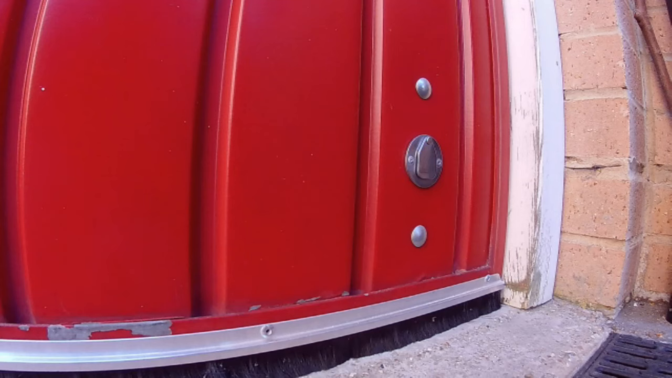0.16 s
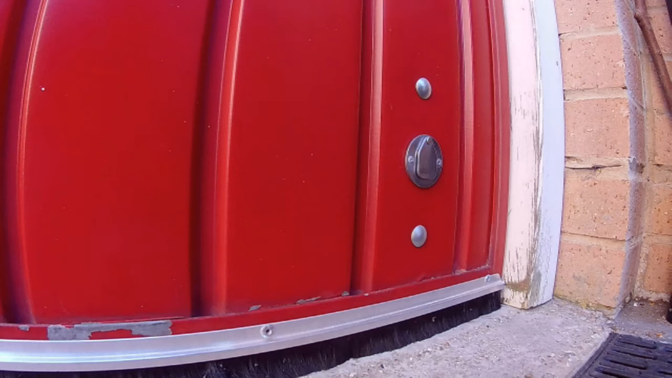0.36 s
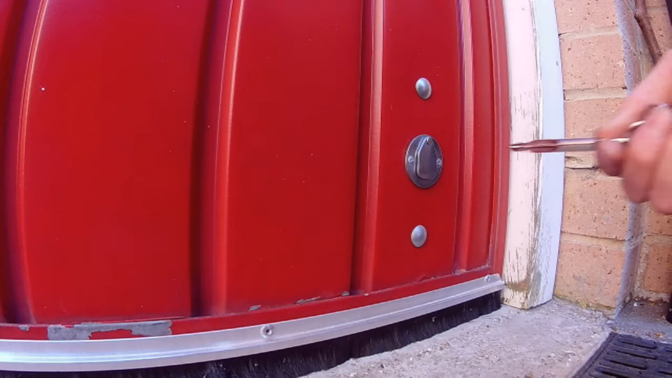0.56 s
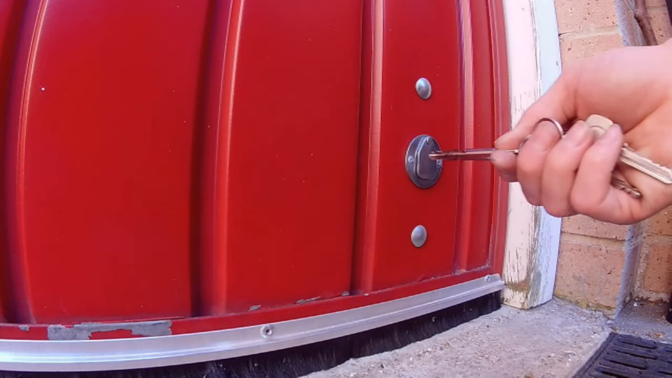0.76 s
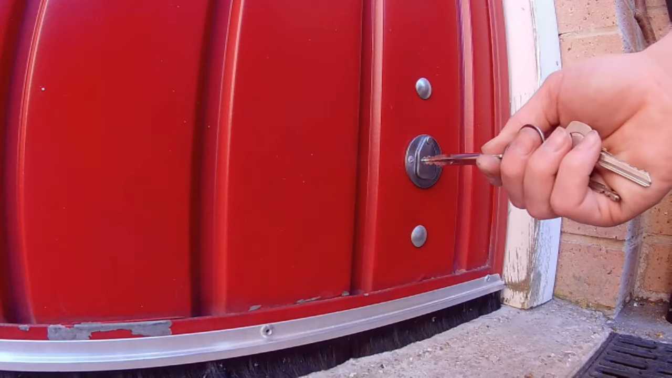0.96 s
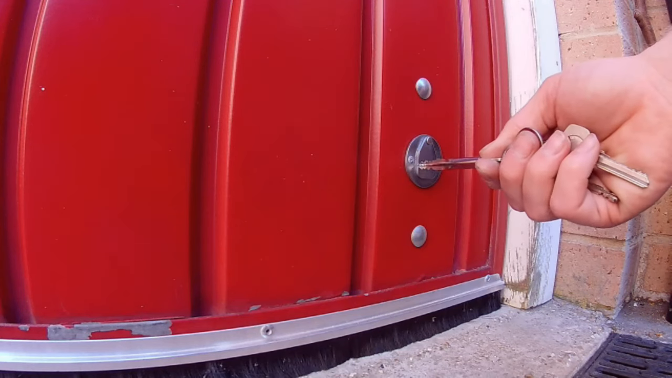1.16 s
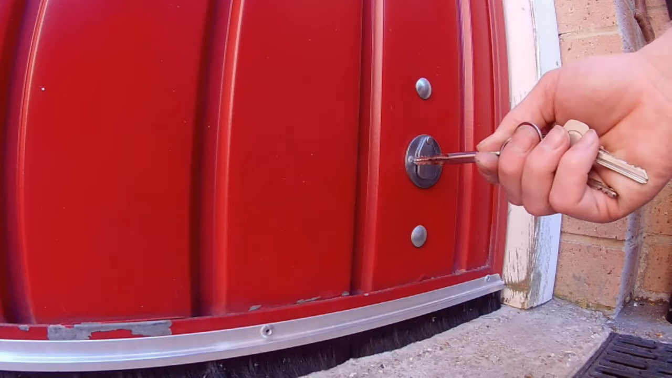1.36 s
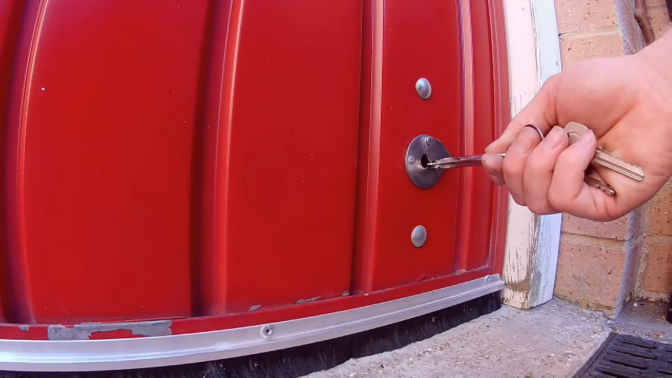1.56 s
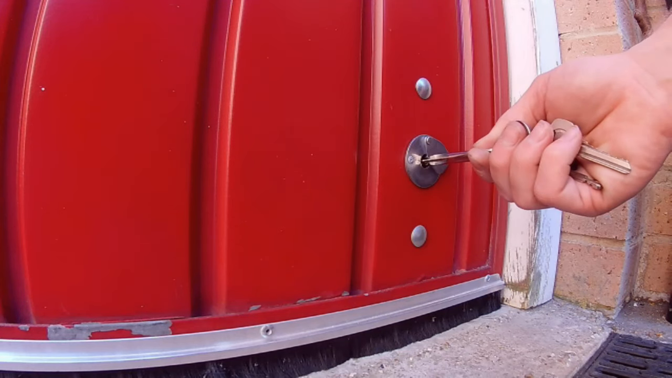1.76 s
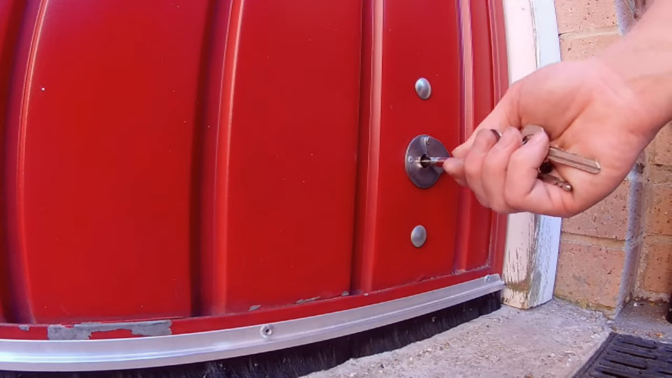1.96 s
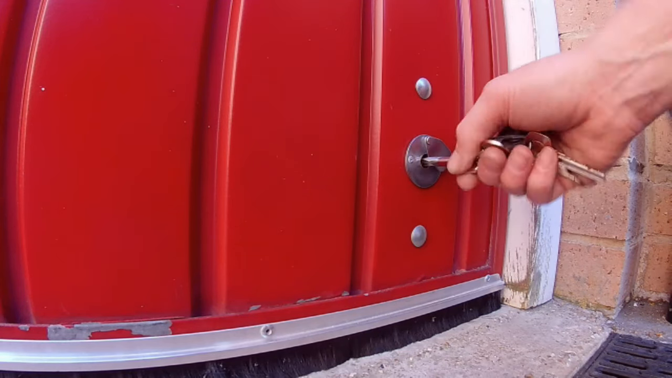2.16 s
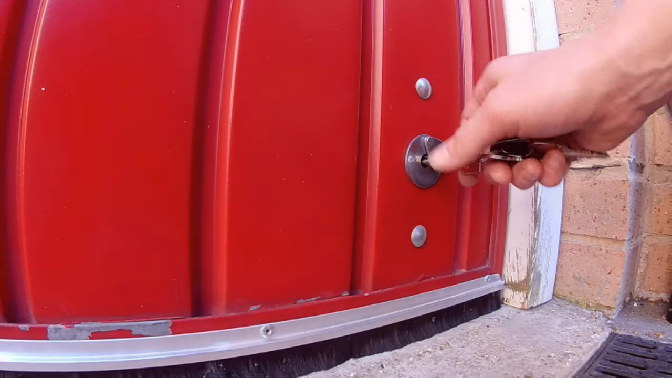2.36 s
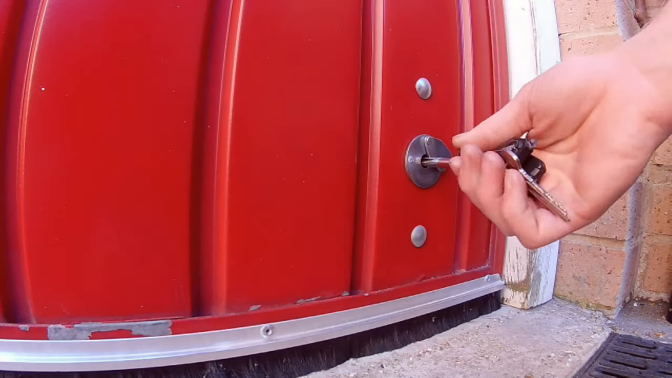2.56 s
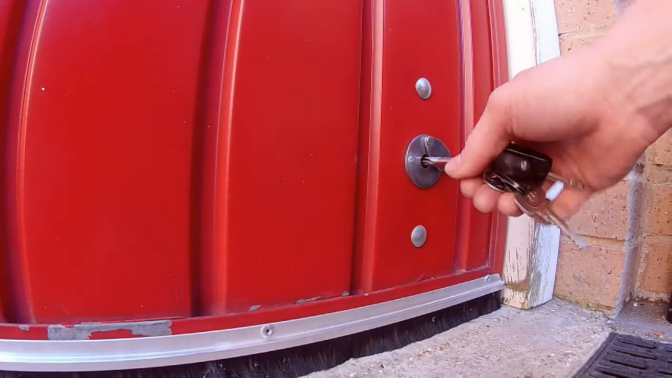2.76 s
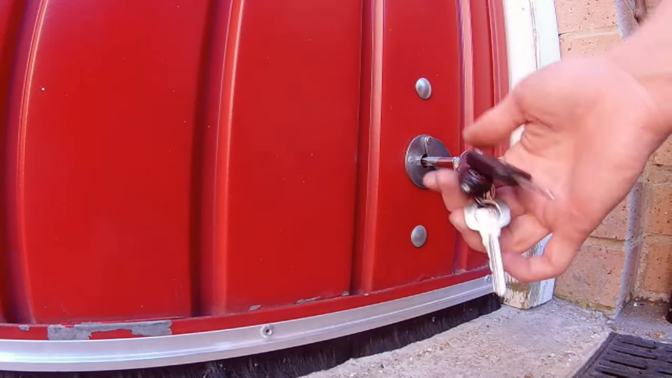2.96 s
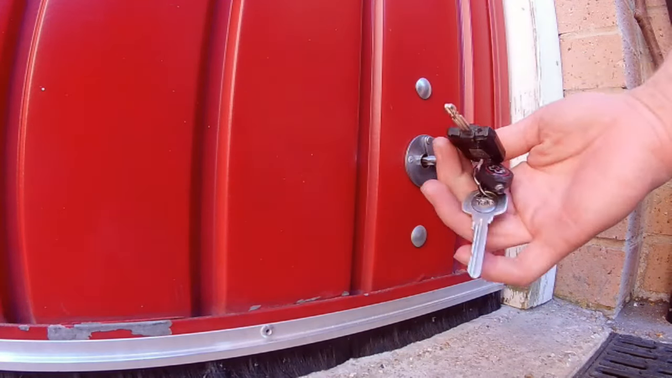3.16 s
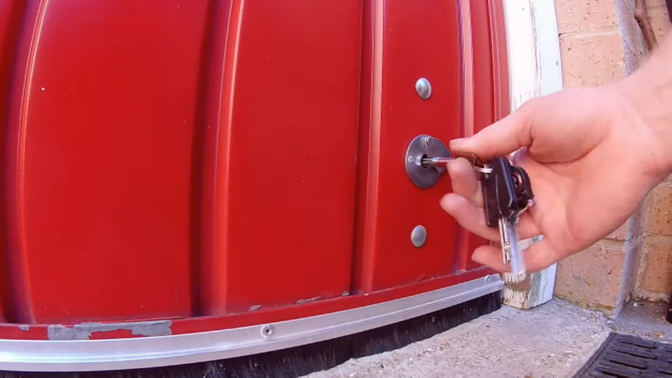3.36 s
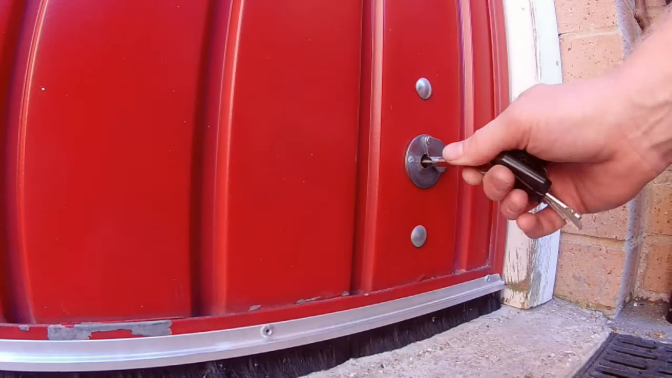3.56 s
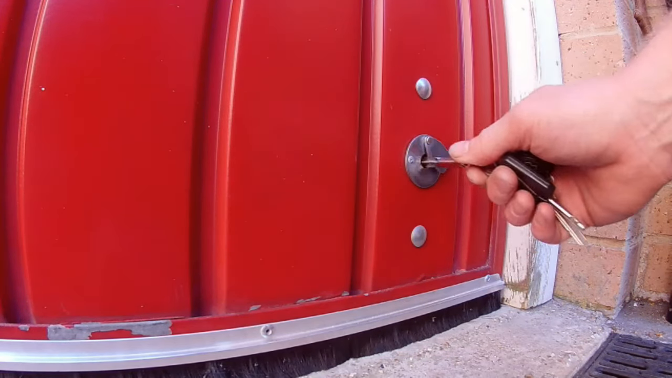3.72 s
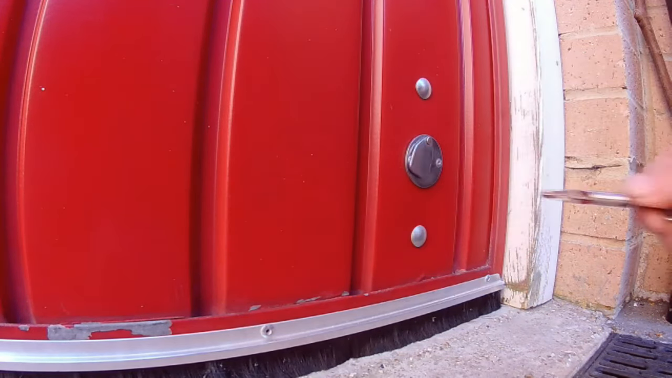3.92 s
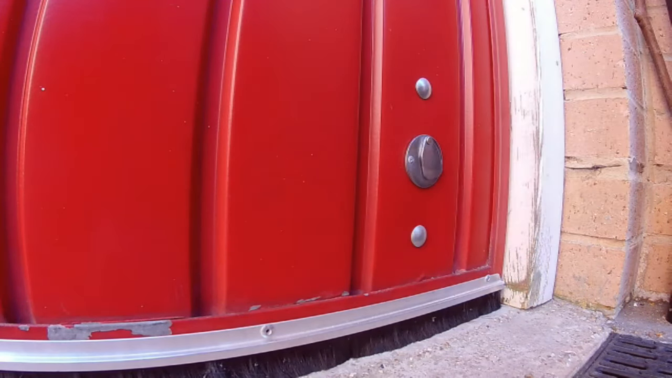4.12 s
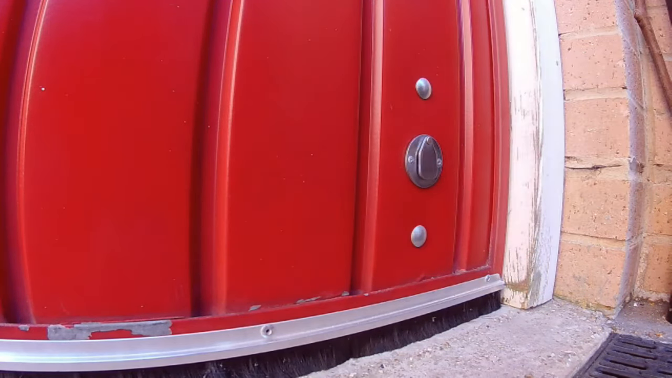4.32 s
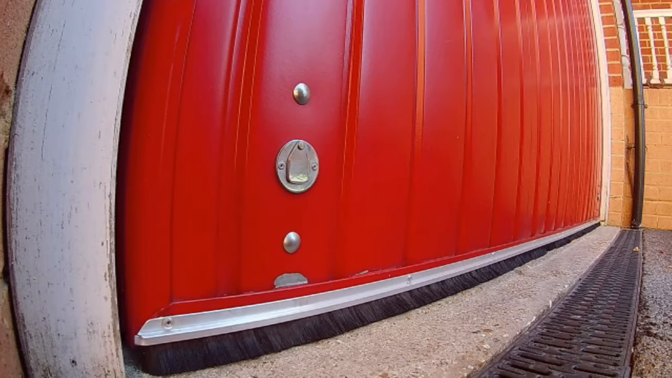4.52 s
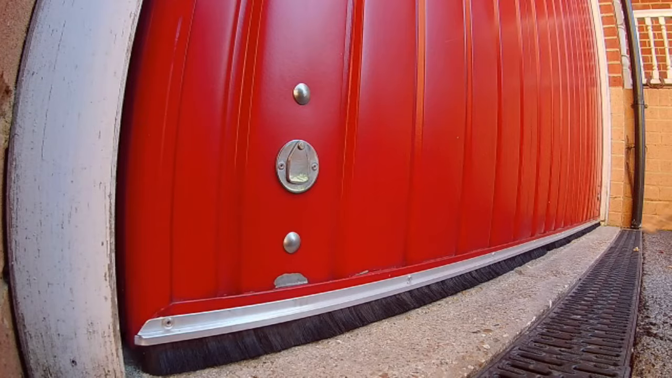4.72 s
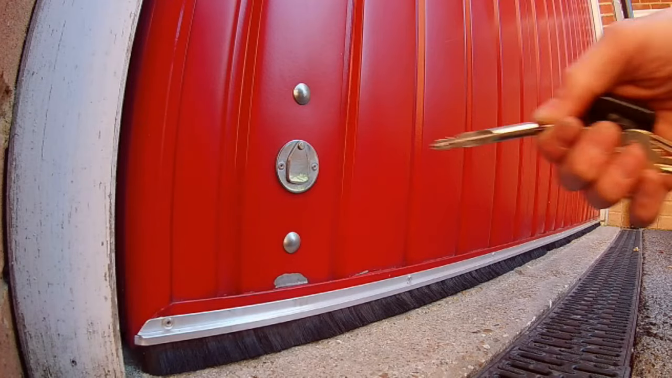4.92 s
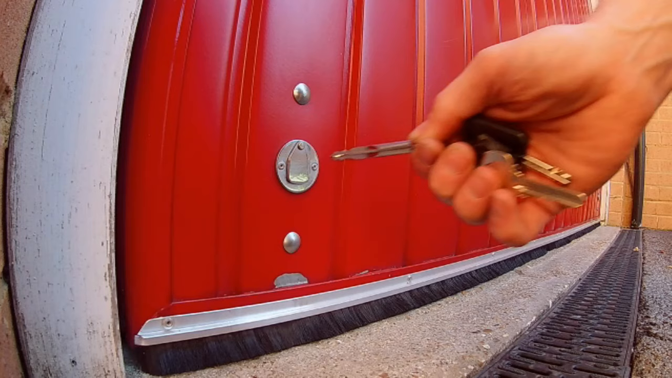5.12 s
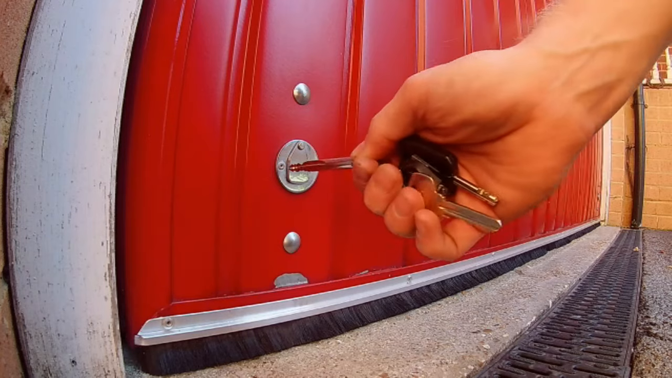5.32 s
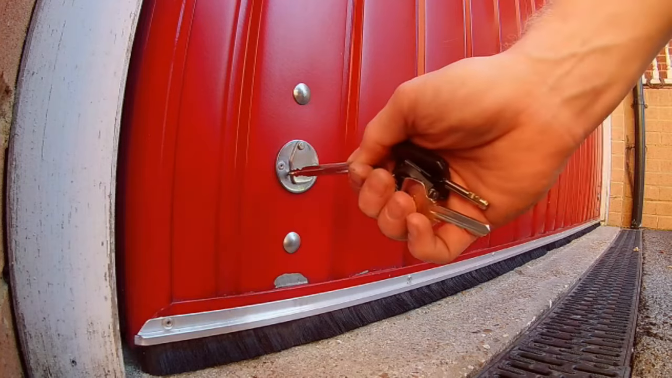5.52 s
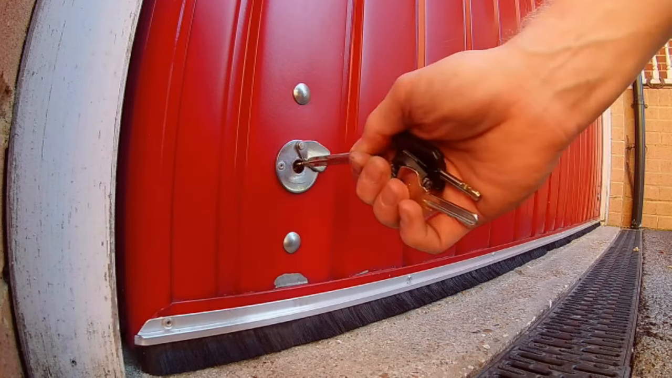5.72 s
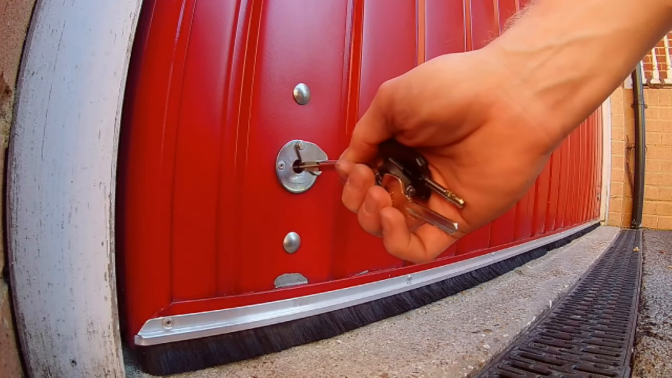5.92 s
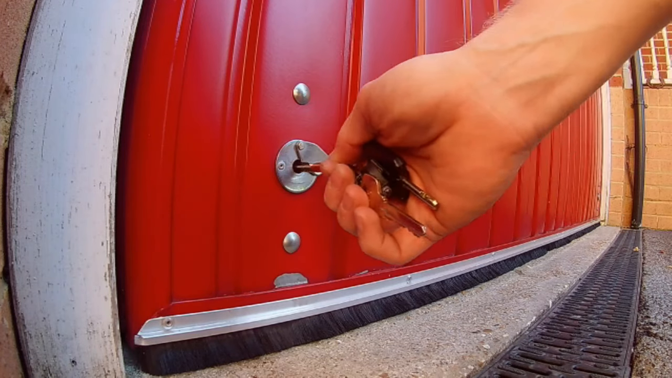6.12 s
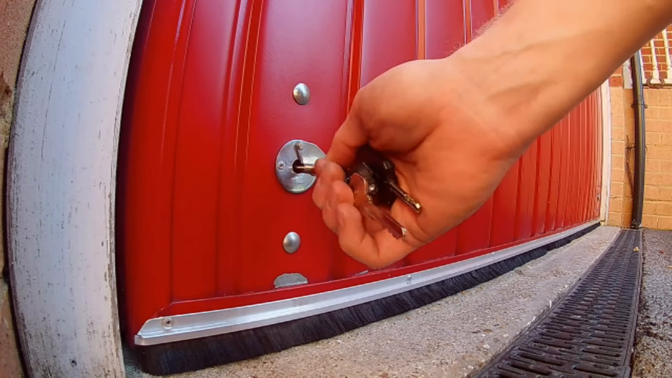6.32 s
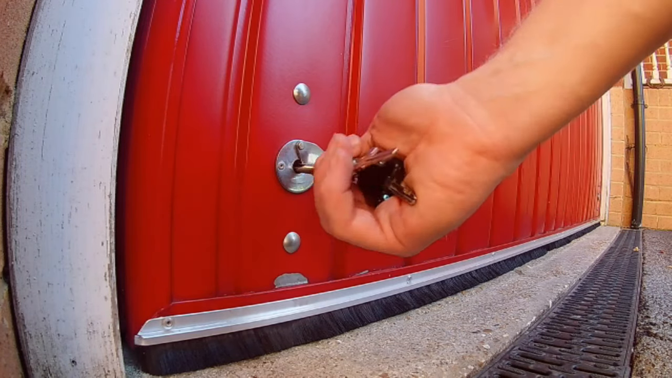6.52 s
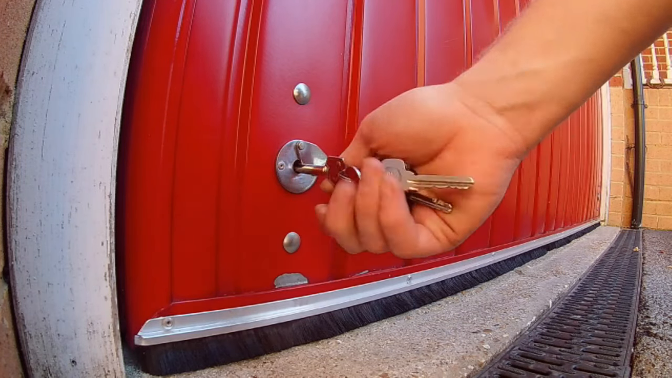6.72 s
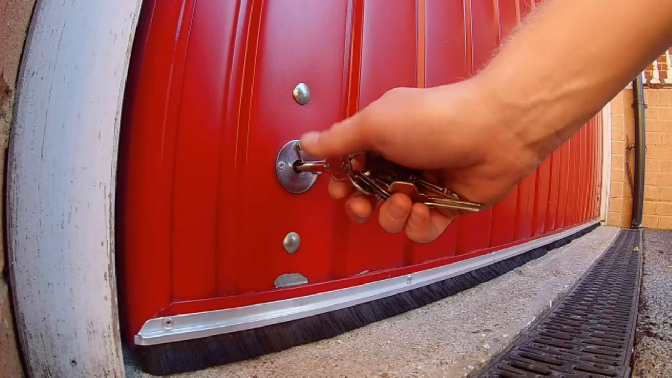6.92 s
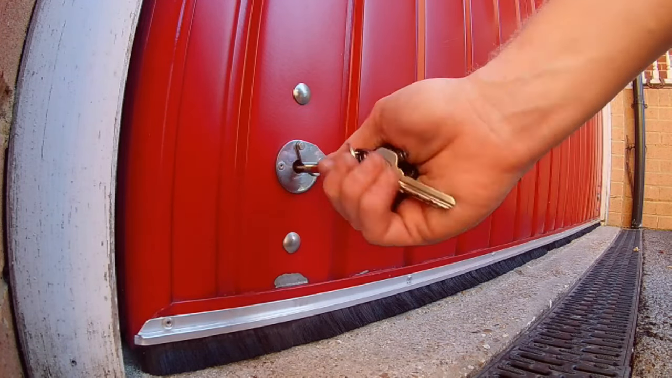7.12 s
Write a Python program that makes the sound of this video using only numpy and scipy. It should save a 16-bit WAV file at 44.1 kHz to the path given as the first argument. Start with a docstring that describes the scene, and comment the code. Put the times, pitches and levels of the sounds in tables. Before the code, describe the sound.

Outdoors, close by, a key taps and scrapes into the lock of a steel garage door and turns with stiff clacks, the panel booming low. The other keys clink on their ring, and the key comes out with a sharp clank. After a short pause it scrapes into a second lock and turns, ending in a loud rattling clack and a hollow bong. A faint distant rumble lies behind.

```python
"""Outdoors at two steel garage doors, a long key is fed into each lock in turn, twisted and drawn out.
Impacts and stick-slip friction in the lock excite the bending modes of the sheet steel. The panel booms
under the hand and bongs as the key levers against it; the first door sways once the key is out.
The rest of the bunch clinks on its ring. Quiet air and a faint, very high ticking lie behind."""
import sys
import numpy as np
from scipy import signal
from scipy.io import wavfile
from scipy.ndimage import uniform_filter1d

SR = 44100
rng = np.random.default_rng(int(sys.argv[2]) if len(sys.argv) > 2 else 0)


def waveform_to_disk(signal):
    """Save audio, clipped to [-1, 1], as 16-bit WAV at the path in sys.argv[1]."""
    frames = np.transpose(np.atleast_2d(signal))
    scaled = np.clip(frames, -1, 1) * 32767
    samples = np.round(scaled).astype(np.int16)
    wavfile.write(sys.argv[1], SR, samples)


N = 316638
T = np.arange(N) / SR
RING_T = T[:SR]
SECOND_DOOR_S = 4.377

def door_at(s):
    """Index of the door in use at time s."""
    return int(s > SECOND_DOOR_S)

def amp(db):
    """Decibels to amplitude ratio."""
    return 10 ** (np.asarray(db) / 20)

def unit(x, size=None):
    """Normalisation: the first size samples get rms 1."""
    return x / np.sqrt(np.mean(x[:size] ** 2) + 1e-24)

def read(points, hz):
    """Interpolation on a log-frequency axis."""
    f, value = np.transpose(points)
    return np.interp(np.log(hz + 1), np.log(f), value)

def add(mix, s, sound):
    """Superposition of a sound from time s."""
    part = mix[round(s * SR):][:len(sound)]
    part += sound[:len(part)]

def band(x, hz, kind, order=4):
    """Causal Butterworth filter."""
    return signal.sosfilt(signal.butter(order, hz, kind, fs=SR, output="sos"), x)

def narrow_noise(hz, width_hz, order=2):
    """Narrow-band noise: neighbouring components beat, giving a wavering tone."""
    return unit(band(rng.standard_normal(N), [hz - width_hz / 2, hz + width_hz / 2], "band", order))

def colour(x, points, size=8192):
    """Minimum-phase filter through (Hz, dB) points."""
    log_gain = np.log(amp(read(points, abs(np.fft.fftfreq(size, 1 / SR)))))
    taps = np.fft.ifft(np.exp(np.conj(signal.hilbert(log_gain)))).real[:size // 2]
    return signal.fftconvolve(x, taps)[:len(x)]

def modes(table, scatter_db=2.5):
    """Free vibration: a sum of damped sines whose shares vary with the point of impact."""
    hz, db, t60 = np.transpose(table)[:, :, None]
    share = amp(db + scatter_db * rng.standard_normal(hz.shape)) * rng.choice([-1, 1], hz.shape)
    return (share * amp(-60 * RING_T / t60) * np.sin(2 * np.pi * hz * RING_T)).sum(0)

# Air at each door. Each row: frequency in Hz, relative spectral density in dB.
AIR_1 = [(20, -13.5), (107, -3), (270, -14), (738, -24.5), (1000, -20), (1220, -28), (11100, -52.5),
         (12800, -42.5), (16000, -48)]
AIR_2 = [(20, -15), (101, -2.5), (138, -15), (377, -26), (1220, -31), (1440, -38.5), (3200, -48),
         (9670, -57), (16000, -52)]

def air(first_db=-58, second_db=-54, hum_db=-61):
    """Ambient noise: a distant broadband rumble with a narrow-band hum in it."""
    first = amp(first_db) * unit(colour(rng.standard_normal(N), AIR_1))
    second = amp(second_db) * unit(colour(rng.standard_normal(N), AIR_2))
    moved = uniform_filter1d(1. * (T > SECOND_DOOR_S), size=600)
    return (1 - moved) * first + moved * second + amp(hum_db) * narrow_noise(hz=99, width_hz=12)

def ticking(level_db=-70, beat_s=.04, pip_s=.021):
    """Amplitude gating cuts a high whine into pips: one every second beat, now and then a beat early."""
    gate = np.zeros(N)
    beats = np.where(rng.random(N // 2000) < .2, 1, 2)
    for s in np.cumsum(beat_s * beats):
        add(gate, s, np.hanning(round(pip_s * SR)))
    return amp(level_db) * gate * narrow_noise(hz=12770, width_hz=400, order=3)

# The key at each door. Each row: times of first touch, of being home and of being out in seconds,
# panel boom in dB, key resonance while seeking and once home in Hz.
VISITS = [(0.99, 1.668, 3.7, -39.5, 5000, 5450), (5.38, 6.004, 7.18, -49, 4000, 5620)]
# Spread of the key's resonance with the grip, one per lock, in natural-log units of frequency.
KEY_WANDER = [0.27, 0.038]

def key_colour(x, s, ring_db=7, width_hz=480, spacing_hz=100, ripple_db=7, full_ripple_hz=5000):
    """Resonance of key and levers: one broad peak over narrow ones that differ at every contact."""
    _, home, *_, seeking_hz, home_hz = VISITS[door_at(s)]
    key_hz = seeking_hz if s < home else home_hz * np.exp(KEY_WANDER[door_at(s)] * rng.uniform(-1.4, 1))
    hz = np.arange(spacing_hz, SR / 2, spacing_hz)
    depth_db = ripple_db * np.minimum(hz / full_ripple_hz, 1) ** 2
    ripple = amp(depth_db * np.clip(rng.standard_normal(1024)[:len(hz)], -2, 2))
    ripple /= np.sqrt(uniform_filter1d(ripple ** 2, size=11))
    peak_db = ring_db * np.exp(-((hz - key_hz) / width_hz) ** 2)
    return colour(x, np.transpose([hz, 20 * np.log10(ripple) + peak_db]))

# Modes of the keys. Each row: frequency in Hz, relative level in dB, 60 dB decay time in seconds.
KEY_MODES = [(5540, 3, 0.071), (7470, 5, 0.055), (9700, -11, 0.11), (11850, -10.5, 0.11), (12100, -12, .1)]
# Spectrum of a contact. Each row: frequency in Hz, gain in dB.
CLINK_COLOUR = [(500, -24), (1400, -4), (2200, 8.5), (3200, -1), (4300, 7.5), (5400, -1), (6900, 9),
                (8500, -1.5), (11500, -14.5), (14500, -53)]
# Two short, dull handling clicks at the start, then keys touching.
# Each row: start in seconds, level in dB, tilt in dB per octave, contact time in seconds.
CLICKS_AND_CLINKS = [(0.174, -55.5, -8, 0.0025), (0.22, -48, -16, 0.00065), (2.519, -52.5, -7, 0.0041),
                     (2.572, -58.5, 9, 0.007), (2.731, -38, -6.5, 0.0044), (2.959, -53.5, -10, 0.0018),
                     (2.988, -56, -7, 0.0024), (3.023, -51.5, -9, 0.0041), (3.06, -51, -3.5, 0.0067),
                     (3.117, -54.5, 1.5, .003), (3.153, -52, -1.5, 0.0042), (3.256, -42.5, -15, 0.0045),
                     (3.406, -46, -3.5, .002), (3.427, -55, -10, .002), (3.73, -47.5, 3, 0.00086),
                     (5.727, -49, 1, 0.0027), (6.012, -47, 5, 0.0012), (6.444, -50, -8.5, 0.0029),
                     (6.63, -53.5, -7.5, 0.0082), (7.042, -53, 6, 0.003)]

def clicks_and_clinks(hanging_s=(2.7, 3.3), free_ring_db=-7, held_ring_db=-42, size=12000):
    """Damping: handling clicks and held keys die at once; keys that hang free ring on."""
    out, t, octaves = np.zeros(N), T[:size], np.arange(-2, 3)
    for s, db, slope_db, contact_s in CLICKS_AND_CLINKS:
        contact = t * np.exp(-t / contact_s) * np.exp(rng.standard_normal(size))
        chatter = colour(contact * rng.standard_normal(size), CLINK_COLOUR)
        tick = unit(key_colour(chatter, s, ring_db=3), size=900)
        ring = unit(modes(KEY_MODES)[:size] * (1 - np.exp(-t / contact_s)), size=900)
        ring_db = free_ring_db if hanging_s[0] < s < hanging_s[1] else held_ring_db
        tilt = np.transpose([4000 * 2. ** octaves, slope_db * octaves])
        add(out, s, amp(db) * unit(colour(tick + amp(ring_db) * ring, tilt), size=900))
    return out

# Lowest modes of the door. Each row: frequency in Hz, relative level in dB, 60 dB decay time in seconds.
PANEL_MODES = [(59, -5.5, .7), (78, -7, .6), (91.7, 6, 0.43), (106.4, -3, 0.38), (133.45, -13, 0.47)]

def panel_boom(seeking_db=-4, settle_s=.043, release_db_per_s=27):
    """Forced vibration: the unsteady hand drives the panel, fully once the key is home."""
    boom = unit(signal.fftconvolve(rng.standard_normal(N), modes(PANEL_MODES, scatter_db=1.5))[:N])
    hand_db = []
    for touch, home, out, db, *_ in VISITS:
        times = [touch - settle_s, touch, home - settle_s, home]
        press_db = np.interp(T, times, [-60, seeking_db, seeking_db, 0])
        hand_db.append(db + press_db - release_db_per_s * np.maximum(T - out, 0))
    return boom * amp(np.max(hand_db, 0))

# Dense ring of each door's sheet. Each row: frequency in Hz, relative spectral density in dB.
SHEET_1 = [(130, -2), (230, -6), (400, -2.5), (660, -3), (840, -9), (1270, 0.5), (1700, -7), (2150, -11),
           (2600, -18), (3400, -23.5), (4300, -17), (6900, -25.5), (10500, -45), (15500, -74)]
SHEET_2 = [(130, -6), (340, -5), (620, -7.5), (750, -6.5), (1170, 3), (1610, 2), (2100, -8), (3200, -15),
           (4100, -12.5), (6300, -11), (10500, -31.5), (15500, -76)]
# Damping of the sheet. Each row: frequency in Hz, 60 dB decay time in seconds.
SHEET_DECAY = [(150, 2.83), (600, 0.99), (1200, 0.66), (2150, 0.55), (2750, 0.38), (7000, 0.23),
               (12000, 0.14)]
# Prominent modes of each door and its lock.
# Each row: frequency in Hz, relative level in dB, 60 dB decay time in seconds.
LOCK_MODES_1 = [(394, -15, 1.73), (529, -13, 1.03), (674, -10.5, 0.95), (1146, 3.5, 0.15),
                (1221, 8.5, 0.11), (1287, 6.5, 0.14), (1366, 1, 0.34), (1550, -2, 0.22), (2067, -2, 0.13)]
LOCK_MODES_2 = [(912, -14.5, 0.26), (1110, 5, 0.13), (1164, -0.5, 0.25), (1210, 0.5, 0.18),
                (1390, -2.5, 0.31), (1600, -8.5, 0.46), (1904, -10, 0.34)]

def door_ring(s, effort_db=0, flash=1.27, flash_s=.019, rise_s=.0009):
    """Impulse response of a plate: a brief flash, then crowded modes whose treble dies first."""
    sheet, lock = [(SHEET_1, LOCK_MODES_1), (SHEET_2, LOCK_MODES_2)][door_at(s)]
    hz, t, spectrum = signal.stft(rng.standard_normal(SR), SR, nperseg=256)
    decay = amp(-60 * t / read(SHEET_DECAY, hz)[:, None])
    dying = signal.istft(spectrum * decay, SR)[1][:SR]
    crowd = unit(colour(dying * (1 + flash * np.exp(-RING_T / flash_s)), sheet), size=900)
    prominent = amp(-4.5 + .3 * effort_db) * unit(modes(lock), size=900)  # grows with a heavier blow
    return (crowd + prominent) * (1 - np.exp(-RING_T / rise_s))

def voiced(x, clang_db, body_db, edge_db, size, body_hz=780, edge_hz=2800):
    """Contact sets the spectrum: weight adds low body to the mid-band clang, hardness a bright edge."""
    body = unit(band(x, body_hz, "low"), 2 * size)
    clang = unit(band(x, [body_hz, edge_hz], "band"), size)
    edge = unit(band(x, edge_hz, "high"), size)
    return amp(clang_db) * (clang + amp(body_db) * body + amp(edge_db) * edge)

def friction(strokes, slips_per_s=340, catch_s=.0091, deepen_db=7.5, gain_db=-1):
    """Stick-slip friction: surfaces catch and slip in clumps, each slip a tiny blow on the door."""
    out = np.zeros(N)
    slipping = rng.random(N) < slips_per_s / SR
    hardness = np.minimum(rng.exponential(1, N), 3.5)
    grip = np.interp(T / catch_s, np.arange(N), np.clip(rng.standard_normal(N), -2, 2))
    slips = slipping * amp(4 * hardness + 1.5 * grip) * rng.choice([-1, 1], N)
    for start, end, swell_db, clang_db, body_db, edge_db in strokes:
        force = slips[round(start * SR):round(end * SR)]
        bite = 1 - np.exp(-T[:len(force)] / catch_s)
        force = force * amp(np.linspace(0, swell_db, len(force))) * bite
        response = key_colour(door_ring(start, flash=4, flash_s=.004), start)
        ringing = signal.fftconvolve(force, response)
        progress = np.minimum(T[:len(ringing)] / (end - start), 1)
        depth_db = deepen_db * (progress - .5) * (swell_db == 0)  # steady strokes darken as they go
        add(out, start, voiced(ringing, clang_db, body_db + depth_db, edge_db - depth_db, len(force)))
    return amp(gain_db) * out

# Scrapes of the key in the lock, and two faint rustles outside it.
# Each row: start and end in seconds, relative clang in dB, edge in dB re clang.
SCRAPES_AND_RUSTLES = [(0.964, 0.988, -63, 3), (1.695, 1.85, -41.5, -8.5), (1.847, 1.915, -46.5, -9),
                       (3.338, 3.406, -47.5, -2.5), (3.631, 3.721, -57.5, -1), (4.236, 4.277, -62.5, -3),
                       (5.573, 5.655, -51.5, -14), (5.679, 5.828, -44, -3.5), (6.085, 6.152, -47, -5.5),
                       (6.766, 6.829, -52.5, -1.5), (7.03, 7.065, -44.5, -3.5)]

def sliding_strokes(body_db=(-8, -3.5), rub_db=-17.5, rub_edge_db=-16.5):
    """Sliding contact, as strokes for friction(): scrapes, rustles and the key's soft rub while home."""
    for start, end, clang_db, edge_db in SCRAPES_AND_RUSTLES:
        yield start, end, 0, clang_db, body_db[door_at(start)], edge_db
    for _, home, out, boom_db, *_ in VISITS:
        yield home, out, 0, boom_db + rub_db, body_db[door_at(home)], rub_edge_db

USUAL_BLOW_DB, REBOUND_S = -33, .007
# Key and levers strike the lock. Each row: start in seconds, nominal peak of the clang in dB,
# body and edge in dB re clang, length of the rattle in seconds.
KNOCKS = [(0.992, -29, -5.5, -13, 0.0059), (1.1, -40, -4, -14, 0.00015), (1.337, -32.5, -10, -34, .01),
          (1.402, -33.5, -7, -7.5, 0.069), (1.425, -33, -17, -7.5, 0), (1.524, -31, -5.5, -13, 0.0025),
          (1.637, -30, -7, -14, 0.019), (1.728, -32, -5.5, -4.5, 0.025), (1.797, -30, -17, -27, 0.00044),
          (2.068, -31, -9, -8, 0.11), (2.177, -22.5, -9, -12, .029), (2.419, -32, -3, -14.5, 0.0006),
          (2.571, -36, -2, -1, 0.00031), (2.735, -18, -8, -11, 0.0092), (3.152, -31.5, -7.5, -6, 0.061),
          (3.324, -28, -7.5, -24, 0.024), (3.362, -27.5, -10, -16.5, 0.0021),
          (3.729, -18.5, -6, -15.5, 0.0041), (5.369, -33.5, -1.5, -9.5, 0), (5.402, -29, -3, -15, 0),
          (5.654, -35, -6.5, -10, 0.00087), (5.97, -38.5, -1, -3.5, 0.022), (6.014, -28, 1, -11.5, 0.055),
          (6.15, -32.5, 0, -9.5, 0.0012), (6.372, -26, -4.5, -18, 0.048), (6.885, -45.5, 4.5, -13, 0.00044),
          (6.951, -28, 1, -4.5, 0), (6.96, -15.5, -14.5, -16.5, .09)]

def knocks(crest_db=9, heavy_db=-27, rebound_db=-4):
    """Impact excitation: each blow of key tip or lever rings the door; a heavy one rebounds once."""
    out = np.zeros(N)
    for s, peak_db, body_db, edge_db, _ in KNOCKS:
        blow = door_ring(s, peak_db - USUAL_BLOW_DB)
        add(blow, REBOUND_S, (peak_db > heavy_db) * amp(rebound_db) * door_ring(s))
        add(out, s, voiced(key_colour(blow, s), peak_db - crest_db, body_db, edge_db, size=900))
    return out

def lever_strokes(drag_s=.099, drag_db=(-53, -67), swell_db=23, rattle_db=-45, fade_db=-3.5):
    """Loading and release, as strokes for friction(): the key drags until a lever gives and chatters."""
    usual_edge_db = -13.5
    for s, peak_db, body_db, edge_db, rattle_s in KNOCKS:
        door = door_at(s)
        _, home, out, *_ = VISITS[door]
        bite_db = .33 * (edge_db - usual_edge_db)  # a harder contact drags louder and brighter
        effort_db = .57 * (peak_db - USUAL_BLOW_DB)
        tone = body_db - 3, usual_edge_db + bite_db
        if home < s < out:  # the first lock is stiff, the second smooth
            yield s - drag_s, s, swell_db, drag_db[door] + effort_db + bite_db, *tone
        if rattle_s > REBOUND_S:
            yield s + REBOUND_S, s + REBOUND_S + rattle_s, fade_db, rattle_db + effort_db, *tone

# Shoves on the panel. Each row: start in seconds, relative level in dB.
THUMPS = [(1.698, -30.5), (1.752, -36), (1.89, -29.5), (1.961, -27.5), (2.062, -32.5), (2.877, -32),
          (3.341, -37), (3.663, -34.5), (6.033, -35), (6.106, -30), (6.137, -29.5)]

def thumps(gain_db=-1, push_s=.00078):
    """Transient response: the shoved panel jumps in its frame and rings in its lowest modes."""
    out = np.zeros(N)
    for s, db in THUMPS:
        flex = unit(modes(PANEL_MODES) * (1 - np.exp(-RING_T / push_s)), size=1500)
        add(out, s, amp(db + gain_db) * flex)
    return out

# Low modes of the sheet. Each row: frequency in Hz, relative level in dB, 60 dB decay time in seconds.
BONG_MODES = [(133, 4, 0.36), (162.5, 3, 0.47), (205.47, -3, 0.39), (245.5, -8.5, 0.45), (311.5, -6, 0.18),
              (332, -6.5, 0.83), (413, -5, .5)]
# The key levers against the sheet. Each row: start in seconds, level in dB, centre frequency in Hz.
BONGS = [(3.155, -43.5, 312), (5.752, -43, 222.5), (5.799, -39, 216), (6.036, -38.5, 199),
         (6.421, -43.5, 310), (6.952, -33, 355.4), (6.972, -32.5, 155), (7.03, -38, 266)]

def bongs(reach=1.24, sheet_db=-5):
    """Selective excitation: the sheet gives with a hollow bong from the modes near one frequency."""
    out = np.zeros(N)
    for s, db, hz in BONGS:
        around = [hz / reach, hz * reach]
        tone = unit(band(modes(BONG_MODES, scatter_db=-.5), around, "band", order=2), size=2200)
        crowd = unit(band(door_ring(s), around, "band", order=2), size=2200)
        add(out, s, amp(db) * unit(tone + amp(sheet_db) * crowd, size=2200))
    return out

def sway(level_db=-40.5, fade_db_per_s=18):
    """Damped oscillation: the first door rocks in its frame after the key has left it."""
    since_out = T - VISITS[0][2]
    swinging = uniform_filter1d(1. * ((since_out > 0) & (T < SECOND_DOOR_S)), size=1500)
    decay = amp(level_db - fade_db_per_s * np.maximum(since_out, 0))
    return narrow_noise(hz=55.6, width_hz=9.9) * swinging * decay

# Response of the microphone port. Each row: frequency in Hz, gain in dB.
PORT_RESPONSE = [(7300, -5.5), (8100, -23.5), (8800, 1.5), (12500, 10.5), (13300, 17)]

def scene():
    """Superposition: contacts and door, coloured by the port, add to the quiet background."""
    contacts = knocks() + friction([*sliding_strokes(), *lever_strokes()]) + clicks_and_clinks()
    door = bongs() + panel_boom() + thumps() + sway()
    return (colour(contacts + door, PORT_RESPONSE) + air() + ticking())[None]

def record(dry, silence_s=.044, cutoff_hz=15900):
    """Band limiting: a linear-phase low-pass follows a brief opening silence."""
    lowpass = signal.firwin(511, cutoff_hz, window=("kaiser", 9), fs=SR)
    return signal.oaconvolve(dry * (T > silence_s), lowpass[None], "same")

dry = scene()
out = record(dry)
waveform_to_disk(out)
```